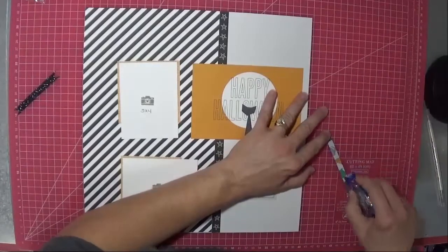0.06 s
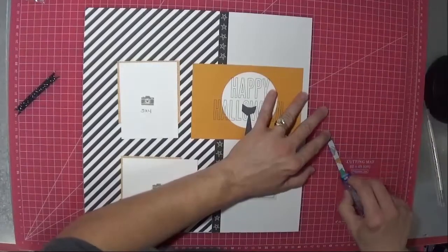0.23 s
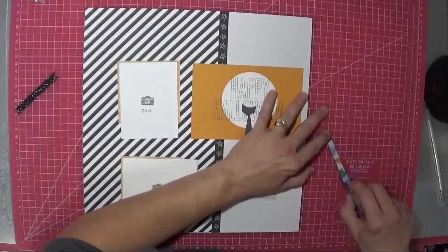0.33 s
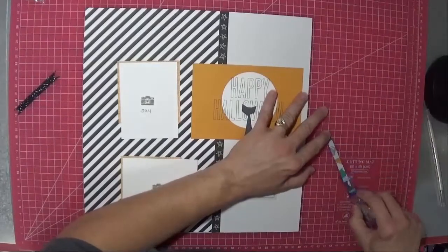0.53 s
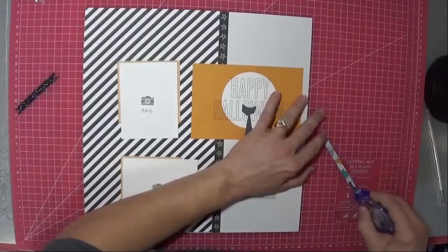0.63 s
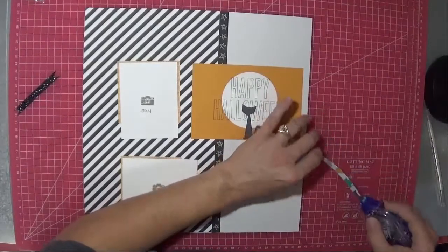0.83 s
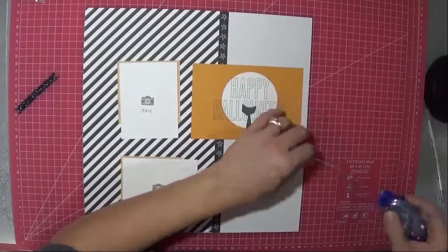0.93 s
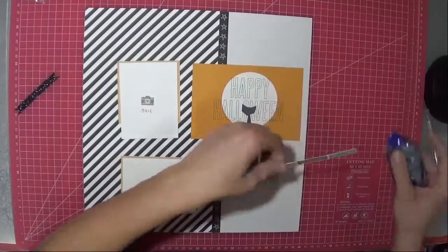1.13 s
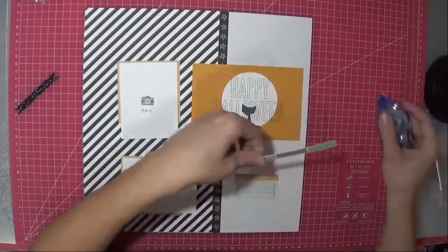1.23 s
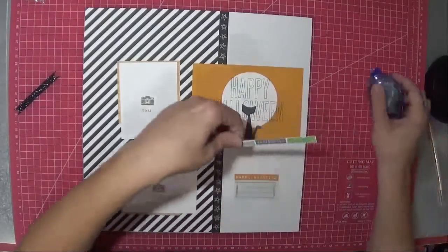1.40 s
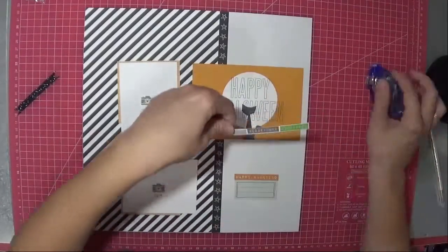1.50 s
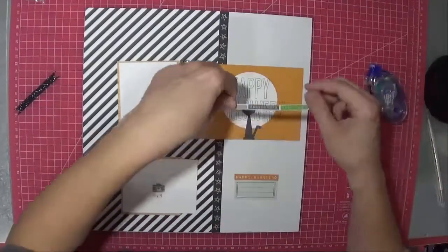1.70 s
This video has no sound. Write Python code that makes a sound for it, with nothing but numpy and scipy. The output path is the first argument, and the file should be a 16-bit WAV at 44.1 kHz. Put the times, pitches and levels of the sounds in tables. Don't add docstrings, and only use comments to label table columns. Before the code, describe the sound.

A plastic tape runner starts with faint touches at 0.18 seconds, then ratchets in dense, uneven bright clicks from 0.24 to 0.48, with one last click at 0.56. A soft dull knock follows at 0.68. Paper crackles lightly around 0.9 to 1.14. The runner clacks onto the mat at 1.31, taps and rattles until 1.62, then quiet. Small room, low appliance hum, overhead camera microphone.

```python
import sys
import numpy as np
from scipy import signal
from scipy.fft import rfft, irfft
from scipy.io import wavfile
from scipy.ndimage import uniform_filter1d, map_coordinates

SR = 44100
rng = np.random.default_rng(int(sys.argv[2]) if len(sys.argv) > 2 else 0)


def how_loud(loudness_db):
    steps = np.asarray(loudness_db, float) / 20
    return 10 ** steps


def waveform_to_disk(signal):
    frames = np.transpose(np.atleast_2d(signal))
    scaled = np.clip(frames, -1, 1) * 32767
    samples = np.round(scaled).astype(np.int16)
    wavfile.write(sys.argv[1], SR, samples)


N = 77175


def ring(x, hz, width):
    return signal.lfilter(*signal.iirpeak(hz, hz / width, fs=SR), x)


def unit(x):
    return x / np.sqrt(np.mean(x ** 2, axis=-1, keepdims=1))


def shaped_noise(points, count):
    hz = np.fft.rfftfreq(N, 1 / SR) + 1
    point_hz, point_db = np.array(points).T
    gain = how_loud(np.interp(np.log(hz), np.log(point_hz), point_db))
    return unit(irfft(rfft(rng.standard_normal((count, N))) * gain, N))


def air():
    # frequency in Hz, level in dB.
    tone = [(18, -70), (30, -17), (146, -5.5), (277, -9), (401, -11), (527, -12.5), (763, -19.5),
            (3280, -25.5), (11000, -32.5), (14300, -70), (22000, -120)]
    # frequency in Hz, rms level in dB, width in Hz.
    hums = [(58.6, -76, 4.6), (122.6, -64.5, 18.3), (174, -65, 8.7), (307.5, -66.5, 39)]
    # frequency in Hz, level in dB.
    whines = [(522.5, -66), (581, -66.5)]
    t = np.arange(N) / SR
    mid, side = shaped_noise(tone, count=2)
    high_side = signal.lfilter(*signal.butter(2, 420, "high", fs=SR), side)
    side = high_side * how_loud(-5) + side * how_loud(-13)
    hum = sum(how_loud(db) * unit(ring(ring(rng.standard_normal(N), hz, width), hz, width))
              for hz, db, width in hums)
    whine = sum(how_loud(db - 0.5) * np.sin(2 * np.pi * hz * t) for hz, db in whines)
    whine = whine * (1 + 0.064 * np.array([[-1], [1]]))
    return how_loud(-55 - 3) * (mid + side * np.array([[1], [-1]])) + hum + whine


def rattles(rows, body, low_db, bright_db, low_lag_ms):
    ticks_per_s, tick_spread_db, detune = 9000, 2.5, 0.025
    rise_ms, fall_ms, sag_db_per_ms = 0.44, 2.14, 0.5
    size = 2048
    start, level, length_ms, low_rel, bright_rel = np.array(rows).T[:, :, None]
    ms = np.arange(size) * 1000 / SR
    f = np.fft.rfftfreq(size, 1 / SR) + 1
    chance = rng.random((len(rows), 3, size))

    happens = chance[:, 0] < ticks_per_s / SR
    direction = np.sign(chance[:, 1] - 0.5)
    ticks = happens * direction * how_loud(-tick_spread_db * np.log(chance[:, 2] + 0.04))
    fade = np.exp(-np.clip(ms - length_ms, 0, None) / fall_ms)
    shape = np.clip(ms / rise_ms, 0, 1) * fade * how_loud(-sag_db_per_ms * ms)
    strength = np.sqrt(np.mean(shape ** 2, axis=1, keepdims=True))
    click = np.exp(-1j * np.pi * f * length_ms / 1000)
    drive = np.array([rfft(ticks * shape), click])
    tune = 1 + detune * (2 * chance[:, 1, -10:, None] - 1)

    bands = []
    for g, group in enumerate(body):
        response = 0
        for k, (hz, width, db) in enumerate(group):
            tuned = hz * tune[:, 3 * g + k]
            peak = (1 + 1j * (f / tuned - tuned / f) * tuned / (2 * width)) ** -2
            response = response + (-1) ** k * how_loud(db) * peak
        bands.append(strength * unit(irfft(drive * response)))
    low, mid, bright = bands
    low = np.roll(low, int(low_lag_ms * SR / 1000), axis=-1)
    mix = mid + how_loud(low_rel + low_db) * low + how_loud(bright_rel + bright_db) * bright
    sound = how_loud(level - 13.0) * mix

    out = np.zeros((2, N + size))
    for row, events in zip(out, sound):
        np.add.at(row, (start * SR).astype(int) + np.arange(size), events)
    return out[:, :N]


def rub():
    # start in seconds, length in seconds, level in dB, centre frequency in Hz.
    slides = [
        (0.178, 0.039, -54.5, 2540),
        (0.242, 0.17, -48, 5100),
        (0.348, 0.0098, -19, 5940),
        (0.529, 0.0066, -47, 6000),
        (0.66, 0.084, -56.5, 8450),
        (0.909, 0.019, -43, 4900),
        (1.082, 0.07, -63, 4000),
        (1.241, 0.067, -56, 3200),
        (1.306, 0.13, -51.5, 4450),
    ]
    t = np.arange(N) / SR
    unevenness = unit(uniform_filter1d(rng.standard_normal(N), size=80))
    grit = rng.standard_normal(N) * how_loud(2.0 * unevenness)
    total = np.zeros(N)
    for start, length, db, hz in slides:
        fade = np.clip(np.minimum(t - start, start + length - t) / 0.009, 0, 1)
        total += how_loud(db) * unit(ring(grit, hz, 1.5 * hz)) * fade
    return total


def ratchet():
    # start in seconds, middle level in dB, rattle length in ms,
    # low body level in dB, bright body level in dB (both relative to the middle).
    clicks = [(0.1782, -32, 10.3, -7.5, -18.5), (0.1935, -38, 14, -6, -25), (0.2307, -34, 1.1, -5, -11),
              (0.2448, -16.5, 6.9, -15, -9), (0.2524, -24.5, 5, -14, -10), (0.2578, -24, 3.2, -23, -16),
              (0.2704, -15.5, 3.24, -14, -9.5), (0.2755, -22.5, 2.8, -10, -15),
              (0.2833, -23.5, 2.4, -20, -9), (0.3012, -16.5, 4, -14.5, -10),
              (0.3055, -18.5, 4.1, -15.5, -10), (0.3146, -34, 1.6, -12, -17),
              (0.3185, -26.5, 2.6, -14, -19), (0.3287, -14, 2.1, -14, -7.5),
              (0.3335, -16.5, 5.5, -11.5, -11), (0.3485, -32, 5.5, -14, -8),
              (0.3528, -11.5, 2.24, -13.5, -10.5), (0.3637, -19, 2.4, -11, -5),
              (0.3662, -12, 2.95, -14.5, -12), (0.3746, -20.5, 5, -9, -11), (0.3805, -14.5, 2.3, -11, -5),
              (0.3897, -20.5, 2.6, -1, -9), (0.3922, -12, 2.7, -15.5, -9.5), (0.4012, -22, 1.7, -16, -18),
              (0.4035, -10.5, 1.78, -14, -7), (0.4156, -14, 2.6, -11.5, -10.5),
              (0.4318, -12.5, 3.5, -13.5, -8.5), (0.4502, -12.5, 4.3, -9.5, -8),
              (0.4744, -12.5, 2.32, -9.5, -8), (0.4775, -21.5, 2.9, -22, -3), (0.554, -42, 2.4, -3, -3),
              (0.5606, -12.5, 3.5, -15.5, -8)]
    # frequency in Hz, width in Hz, level in dB.
    shell = [
        [(1314, 314, 4.5), (1610, 278, 6.5), (2032, 140, 6.5)],
        [(3304, 870, 5.5), (4980, 720, 3), (6050, 310, -4.5)],
        [(7340, 1260, 6.5), (8640, 1450, 7), (9450, 1460, 5)],
    ]
    return rattles(clicks, shell, 9.6, 9.67, 1.16)


def thuds():
    # start in seconds, level in dB, frequency in Hz,
    # time to fall by 60 dB in seconds.
    knocks = [(0.181, -49, 112, 0.058), (.180, -53.5, 610, 0.037), (0.6783, -32.5, 1500, 0.013),
              (.678, -39.5, 3160, 0.014), (.93, -53.5, 796, 0.14), (1.314, -43, 133, 0.17),
              (1.312, -44, 692, 0.13), (1.376, -45.5, 587, 0.099), (1.376, -47, 311, 0.1),
              (1.445, -43.5, 309, 0.13), (1.447, -46, 617, 0.13)]
    t = np.arange(N) / SR
    spread = 2 ** np.linspace(-0.6, 0.8, num=11)[:, None]
    weight = np.minimum(spread, 1 / spread) ** 4.5
    total = np.zeros(N)
    for start, db, hz, t60 in knocks:
        age = np.clip(t - start, 0, None)
        phase = 0.36 * rng.random(spread.shape)
        tones = np.sin(2 * np.pi * (hz * age * spread + phase)) * weight
        fade = how_loud(-60 * age / t60) * (1 - np.exp(-age / 0.00036))
        total += how_loud(db - 2.5) * tones.sum(axis=0) * fade
    return total


def lifting():
    # start in seconds, middle level in dB, rattle length in ms,
    # low body level in dB, bright body level in dB (both relative to the middle).
    crackles = [(0.7945, -50, 3, -17, -3.5), (0.8938, -40, 3.9, -14, -4), (0.9009, -28, 3.1, -11, -12),
                (0.9105, -41, 11, -4, 0.5), (0.921, -35, 4.6, 0, -21), (0.9258, -39, 1.3, -18, 3),
                (0.9325, -27, 0.65, -5, -10), (0.9342, -19.5, 4.1, -14.5, -8.5),
                (0.938, -30, 4.6, -10, -26), (0.9485, -24.5, 2.9, -2.5, -7.5), (0.9513, -21.5, 2.8, -9, -8),
                (0.9558, -25.5, 3.3, -22, -14), (0.962, -39, 6, -14, -31), (1.059, -35.5, 6.1, -12, -15),
                (1.1044, -28.5, 4.6, -15, -11), (1.1292, -36.5, 3.3, -14, -24),
                (1.138, -31.5, 2.4, -18.5, -17), (1.2378, -38, 11, -12.5, -26), (1.7065, -56, 4, -20, 1.5)]
    # frequency in Hz, width in Hz, level in dB.
    paper = [
        [(1570, 470, 0.18), (2240, 440, -1.1)],
        [(3000, 750, 0), (4570, 520, 0)],
        [(7200, 1650, 38.6), (9700, 830, 29)],
    ]
    return rattles(crackles, paper, 8.65, 6.6, 0)


def wobble():
    # start in seconds, middle level in dB, rattle length in ms,
    # low body level in dB, bright body level in dB (both relative to the middle).
    rocks = [
        (1.2533, -34.5, 8.3, -10, -19),
        (1.4628, -19, 3.2, -17, -10),
        (1.466, -17, 3.8, -37, -14),
        (1.5314, -21, 3.4, -16.5, -22.5),
        (1.5374, -26, 5.9, -19.5, -13.5),
        (1.5467, -33.5, 7.4, -10, -10),
        (1.5543, -35.5, 9.8, -14, -12),
        (1.5974, -38, 10.5, -9.5, -17),
        (1.6155, -25.5, 2.7, -17.5, -23),
    ]
    # frequency in Hz, width in Hz, level in dB.
    cap = [
        [(1980, 910, 0)],
        [(3220, 730, -6), (4050, 270, -0.5), (4306, 210, 6.5)],
        [(6330, 250, 0), (7980, 1760, 0)],
    ]
    return rattles(rocks, cap, 8.9, 7.7, 0)


def setting():
    # start in seconds, middle level in dB, rattle length in ms,
    # low body level in dB, bright body level in dB (both relative to the middle).
    hits = [(1.3113, -13, 2, -12.5, -13), (1.3135, -11, 2.59, -25, -5), (1.3185, -25, 2, -25, -15),
            (1.3218, -29.5, 2.5, 3, -17), (1.3268, -31, 2.5, -5, -12), (1.3374, -39, 5, 4, -7),
            (1.3742, -30, 3.2, 4, -10), (1.3804, -22, 3.5, -17, -20), (1.4096, -33, 3.6, -12, -23),
            (1.4135, -37, 2, -7, -10), (1.4405, -31.5, 2, 1, -15), (1.4442, -21.5, 2.5, -22, -17),
            (1.4498, -18.5, 2.8, -10, -10.5), (1.4553, -32.5, 2.5, 0, -3)]
    # frequency in Hz, width in Hz, level in dB.
    casing = [
        [(1540, 310, 4.7), (1740, 250, 0.7), (2140, 170, -5.5)],
        [(3200, 910, 3), (4000, 440, 2.5), (5300, 580, 0)],
        [(6070, 2800, -0.69), (8800, 2550, 0.17)],
    ]
    return rattles(hits, casing, 9.5, 6.2, 0.3)


def room(x):
    level_db, t60_s, alike = -8.5, 0.21, 0.74
    low_db, low_hz = 1, 2400
    t = np.arange(SR // 2) / SR
    a, b = rng.standard_normal((2, len(t))) * how_loud(-60 * t / t60_s) * np.clip(t / 0.0015, 0, 1)
    tail = np.array([a * np.sqrt(1 + alike) + sign * b * np.sqrt(1 - alike) for sign in (1, -1)])
    tail = signal.lfilter([1, 0.35], [1], tail)
    tail = tail + (how_loud(low_db) - 1) * signal.lfilter(*signal.butter(1, low_hz, fs=SR), tail)
    tail = tail / np.sqrt(np.sum(tail ** 2) / 2)
    return how_loud(level_db) * signal.fftconvolve(tail, x[None], axes=1)[:, :N]


def scene():
    pans_db = np.array([-2.5, -3, -4, -3])
    right_lag_samples = 0.17
    thin = signal.butter(6, 1063, "high", fs=SR, output="sos")
    parts = signal.sosfilt(thin, [ratchet() + rub(), lifting(), setting(), wobble()])
    left = np.dot(how_loud(pans_db / 2), parts[:, 0])
    right = np.dot(how_loud(-pans_db / 2), parts[:, 0])
    right = map_coordinates(right, [np.arange(N) - right_lag_samples], order=3, mode="nearest")
    knocks = thuds()
    to_room = parts[:3, 1].sum(axis=0) + how_loud(-7) * parts[3, 0] + how_loud(-5) * knocks
    background = (knocks + air()) * how_loud(np.array([[-0.6], [0.6]]))
    return np.array([left, right]) + room(to_room) + background


def band_limit(x):
    return signal.sosfilt(signal.butter(12, 12140, fs=SR, output="sos"), x)


def record(dry):
    rounded = np.tanh(1.798 * dry) / 1.437
    top_cut = signal.ellip(7, 0.5, 52, 10887, fs=SR, output="sos")
    return band_limit(signal.sosfilt(top_cut, rounded))


dry = scene()
out = record(dry)
waveform_to_disk(out)
```